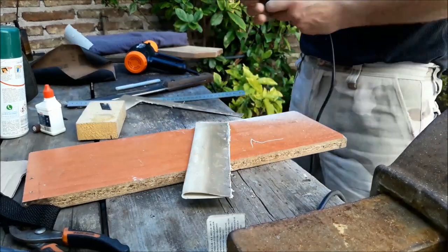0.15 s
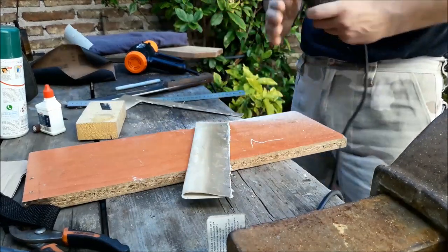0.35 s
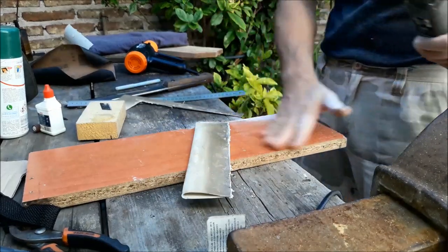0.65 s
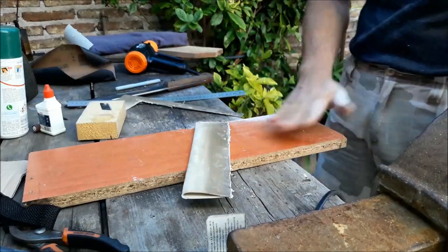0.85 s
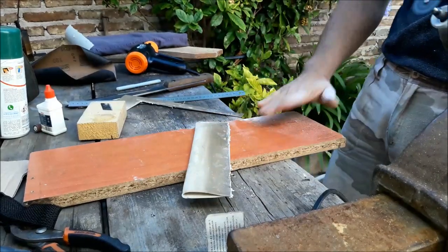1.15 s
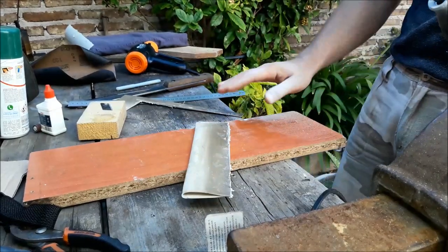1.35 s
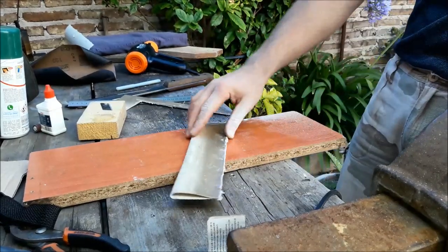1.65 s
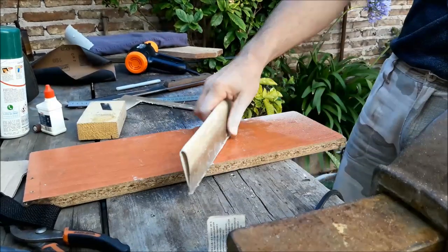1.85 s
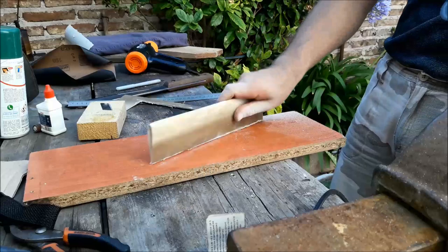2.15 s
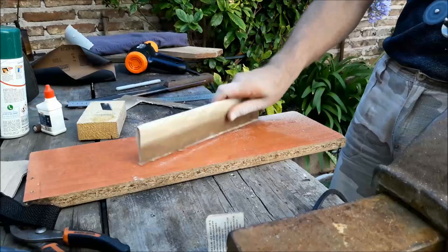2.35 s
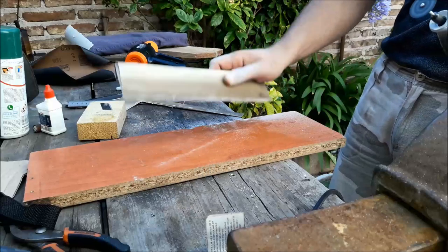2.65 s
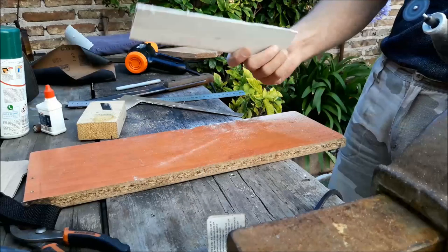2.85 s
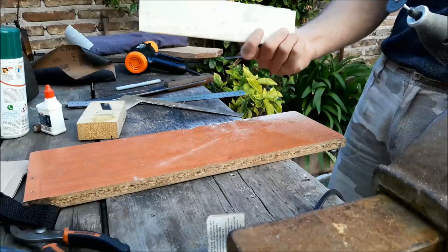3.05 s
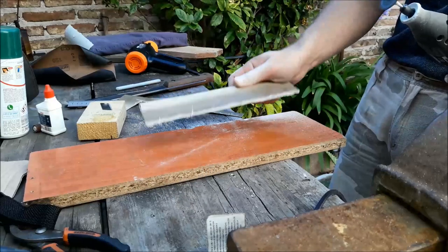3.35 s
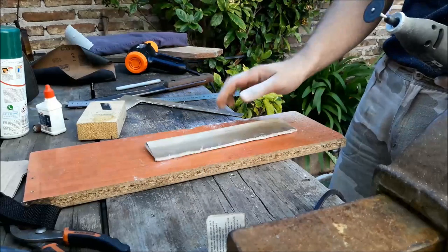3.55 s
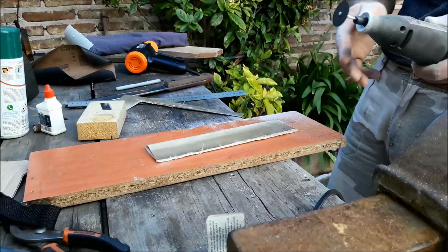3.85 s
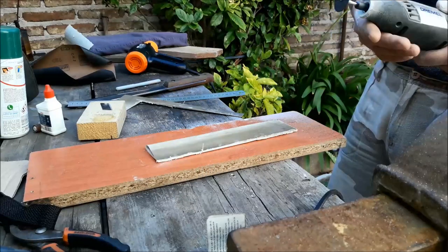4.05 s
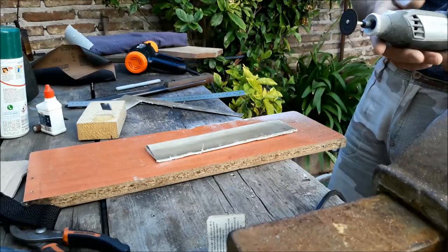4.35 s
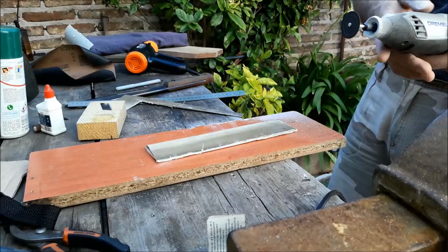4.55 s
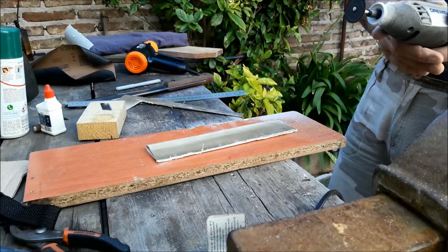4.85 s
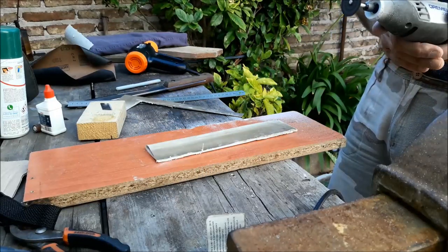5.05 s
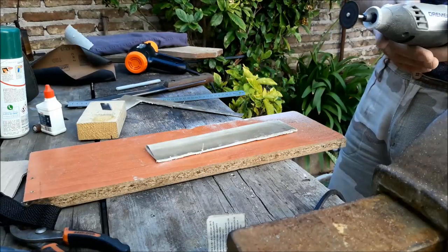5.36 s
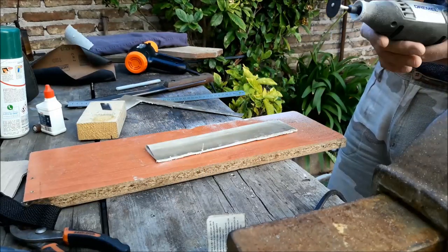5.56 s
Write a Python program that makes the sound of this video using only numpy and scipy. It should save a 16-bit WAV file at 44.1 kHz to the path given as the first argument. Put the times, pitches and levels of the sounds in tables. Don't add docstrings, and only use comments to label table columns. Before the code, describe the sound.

A small rotary tool whines and hisses freely at high speed while plastic pipe raps a board three times, then it begins winding down.

```python
import sys
import numpy as np
from scipy import signal
from scipy.io import wavfile
from scipy.ndimage import uniform_filter1d, minimum_filter1d

SR = 44100
rng = np.random.default_rng(int(sys.argv[2]) if len(sys.argv) > 2 else 0)


def volts_from_decibels(level):
    exponent = np.asarray(level, float) / 20
    return 10 ** exponent


def generate_wav(sig):
    pcm = np.round(np.clip(np.atleast_2d(sig).T, -1, 1) * 32767).astype(np.int16)
    wavfile.write(sys.argv[1], SR, pcm)


N = 252247

CONTACT_S = [
    .743,
    1.276,
    1.936,
    2.2568,
    2.4277,
    2.6019,
    3.651,
    3.702,
]
# kind, weight into bench/dB, knock of board/dB, snap of edge and pipe/dB
CONTACT_LEVELS = [
    ("pat", -33.5, -48, -47),
    ("pat", -28, -33, -36),
    ("pat", -43, -45, -46),
    ("knock", -20, -3, 3),
    ("knock", -15.5, -1, 5),
    ("knock", -15, -7, 9),
    ("lay", -30, -27, -17),
    ("lay", -33, -49, -23),
]


def in_time(rows):
    s, *columns = np.transpose(rows)
    return [np.interp(np.arange(N) / SR, s, c) for c in columns]


def rms_one(x):
    return x / np.sqrt(np.mean(x ** 2) + 1e-20)


def noise():
    return rng.standard_normal(N)


def drift(rate_hz):
    r = np.exp(-80 * np.pi * rate_hz / SR)
    slow = signal.lfilter([1], [1, -2 * r, r * r], rng.standard_normal(N // 40 + 2002))[2000:]
    return np.interp(np.arange(N) / 40, np.arange(len(slow)), rms_one(slow))


def band(x, low_hz, high_hz, order=2):
    return signal.sosfilt(signal.butter(order, [low_hz, high_hz], "band", fs=SR, output="sos"), x)


def ring(clicks, hz, t60_s):
    r = volts_from_decibels(-60 / (t60_s * SR))
    w = 2 * np.pi * hz / SR
    return signal.lfilter([0, np.sin(w)], [1, -2 * r * np.cos(w), r * r], clicks + 1e-18)


def tool():
    # t/s, nearness as case roar level/dB, vents turned to the microphone/dB
    hand = [(0, -23.5, -1), (.05, -24.5, -2.5), (.17, -23.5, 0), (.35, -25, -3.5), (.68, -25.5, -4),
            (.81, -28, 3.5), (1.16, -27.5, -1.5), (1.4, -27.5, -1.5), (1.7, -28, -4), (2.23, -29.5, -2.5),
            (3.45, -26, -4), (3.6, -25.5, -5), (3.8, -26, -3), (4.16, -25.5, 1), (4.65, -27.5, 1.5),
            (4.99, -28.5, 1), (5.1, -28, 2), (5.72, -27, 0)]
    # t/s, hollow resonance f/Hz, its level against the roar/dB
    grip = [(0, 2200, 0), (.12, 2177, 0), (.2, 1710, -8), (.45, 1473, -1), (.75, 1272, -9),
            (2.2, 1249, -11.5), (4.0, 1300, -6), (5.72, 1279, -6.5)]
    speed = shaft_speed()
    near_db, aim_db = in_time(hand)
    hollow_hz, hollow_db = in_time(grip)

    slowed_db = 20 * np.log10(speed / 515.4)
    roar_db = near_db + 2.27 * slowed_db
    mid_db = roar_db - 1.2 + 0.22 * aim_db
    jet_db = near_db + aim_db + 3 * slowed_db
    top_db = -26.5 + 0.36 * (near_db - near_db.mean()) - 0.32 * aim_db + 4.9 * slowed_db
    top_db = top_db - 8 * np.log2(hollow_hz / hollow_hz.min())

    angle = 2 * np.pi * np.cumsum(speed) / SR
    tones = shaft_tones(speed, angle, roar_db)
    pulsing = 1 + .05 * np.sin(angle)
    hiss = air_hiss(mid_db, jet_db, top_db, aim_db)
    roar = volts_from_decibels(roar_db - 3.0) * case_roar(hollow_hz, hollow_db)
    return np.sqrt(2) * tones + yard(roar + pulsing * hiss)


def shaft_speed():
    full_speed, cold_loss, warm_s = 515.4, 3.7, 1.05
    switch_off_s, coast_per_s = 5.113, .423
    t = np.arange(N) / SR
    running = full_speed - cold_loss * np.exp(-t / warm_s)
    return running * np.exp(-coast_per_s * np.maximum(t - switch_off_s, 0))


def shaft_tones(speed, angle, roar_db):
    # t/s, level/dB
    unbalance = [(0, -29.5), (.34, -30), (.64, -25), (.79, -27.5), (1.13, -29.5), (2.6, -28.5),
                 (3.21, -26.5), (3.79, -26), (3.91, -27), (4.18, -33.5), (5.06, -31.5), (5.12, -33),
                 (5.21, -38.5), (5.32, -35), (5.38, -41), (5.72, -39)]
    multiples = [1.5, 2, 2.5, 3, 7, 8, 14, 16, 19, 24]
    multiples_db = [-18, -15.5, -16.5, -18, -25, -21.5, -14, -18, -33, -37]
    unbalance_db = in_time(unbalance)[0]
    whine_db = whine_level()
    blades = 18 * angle + .15 * drift(30)
    tones = volts_from_decibels(unbalance_db + 0.6 * drift(14)) * np.sin(angle)
    tones += volts_from_decibels(whine_db + 1.0 * drift(17)) * np.sin(blades)
    tones += volts_from_decibels(whine_db - 28) * np.sin(2 * blades)
    powered = np.clip((speed - 490) / 20, .25, 1)
    for multiple, db in zip(multiples, multiples_db):
        level = volts_from_decibels(roar_db + db + 3.9 * drift(6.5))
        tones += powered * level * np.sin(multiple * angle + 0.59 * drift(2.8))
    return tones


def whine_level():
    # t/s, level/dB
    beam = [(0, -25), (.17, -17.5), (.38, -21), (.55, -29), (.72, -21), (1.13, -20), (1.48, -21.5),
            (2.1, -24), (2.77, -24), (3.31, -16.5), (3.76, -21.5), (4.05, -19), (4.4, -20.5), (4.85, -24),
            (5.05, -37), (5.16, -26), (5.44, -19.5), (5.72, -13)]
    # t/s, depth/dB, half length/s
    nulls = [(0.123, 11, 0.036), (.21, 5, 0.039), (.32, 18, .025), (0.414, 10, .05), (0.524, 16, .025),
             (.585, 8, 0.037), (0.669, 7, 0.037), (.89, 3, 0.11), (1.07, 2, .07), (1.363, 4.5, 0.14),
             (3.651, 3.5, 0.069), (3.967, 9, 0.071), (4.167, 11, 0.16), (4.97, 9, .04), (5.11, 26, .03),
             (5.173, 14, 0.027), (5.382, 9, 0.052), (5.465, 12, 0.013), (5.536, 4, .05), (5.642, 17, 0.015),
             (5.702, 4, 0.058)]
    t = np.arange(N) / SR
    dips_db = sum(db * np.maximum(1 - np.abs(t - s) / half_s, 0) for s, db, half_s in nulls)
    return in_time(beam)[0] - dips_db


def air_hiss(mid_db, jet_db, top_db, aim_db):
    # f/Hz, width/Hz, level/dB
    vent_peaks = [(7065, 490, -2.5), (6530, 680, -7), (7495, 240, -8)]
    # f/Hz, width/Hz, level/dB
    top_peaks = [(9950, 3900, 6), (12500, 1600, 1), (14700, 1000, -1.5)]
    jet = resonant_noise(vent_peaks, patchy_db=0.96)
    high = band(resonant_noise(top_peaks, patchy_db=0.6), 5900, 21000)
    mid = rms_one(band(noise(), 2360, 5200))
    shadow = np.clip(.55 + .02 * aim_db, 0, 1)
    hiss = volts_from_decibels(mid_db - 1.37) * (mid - shadow * band(mid, 3940, 4620, order=1))
    hiss += volts_from_decibels(jet_db) * jet / np.std(band(jet, 5330, 7050, order=4))
    hiss += volts_from_decibels(top_db) * high / np.std(band(high, 10500, 14000, order=4))
    return hiss


def resonant_noise(peaks, patchy_db):
    out = 0
    for hz, width_hz, db in peaks:
        peak = band(noise(), hz - width_hz / 2, hz + width_hz / 2, order=1) / np.sqrt(width_hz)
        out = out + volts_from_decibels(db + patchy_db * drift(4.0)) * peak
    return out


def case_roar(hollow_hz, hollow_db):
    # f/Hz, level per Hz/dB
    roar_spectrum = [(30, -54), (60, -34), (100, -23.5), (200, -14), (300, -15), (450, -13), (600, -3.5),
                     (770, -10), (1010, 1), (1300, -2.5), (1700, 0.5), (2300, -4.5), (3300, -9.5)]
    out = 0
    edges_hz = 36 * 2 ** np.arange(0, 6.4, 1 / 3)
    hz, db = np.transpose(roar_spectrum)
    for low, high in zip(edges_hz, edges_hz[1:]):
        level_db = np.interp(np.log(low * high) / 2, np.log(hz), db)
        out = out + volts_from_decibels(level_db + 0.62 * drift(9.5)) * band(noise(), low, high)
    out = out / np.std(band(out, 650, 2800))
    low_pass = signal.butter(2, 130, fs=SR, output="sos")
    slow = signal.sosfilt(low_pass, rng.standard_normal((2, N)))
    turn = 2 * np.pi * np.cumsum(hollow_hz) / SR
    hollow = rms_one(slow[0] * np.cos(turn) + slow[1] * np.sin(turn))
    return out + volts_from_decibels(hollow_db) * hollow


def yard(x):
    # delay/ms, level/dB, wander/ms
    echoes = [
        (2.5, -13, .15),
        (5.6, -12, .04),
    ]
    out = x.copy()
    for delay_ms, db, wander_ms in echoes:
        late = np.arange(N) - (delay_ms + wander_ms * drift(.5)) * SR / 1000
        out += volts_from_decibels(db) * np.interp(late, np.arange(N), x)
    return out


def knocks():
    kinds = {"pat": (0, -4, -3), "knock": (-15.5, 2.5, -1), "lay": (-20, -26, 0)}
    # f/Hz, level/dB, t60/s
    edge_modes = [(700, -2, .015), (1200, -2, .02), (2100, -3, .02), (2950, -3, .025), (4300, -7, .02),
                  (5300, -12, .012)]
    # f/Hz, level/dB, t60/s
    pipe_modes = [(930, -13, .05), (1180, -11, .05), (1500, -4, .04), (1720, 0, .04), (2050, -2, .03),
                  (2950, -3, .04)]
    # f/Hz, level/dB, t60/s
    board_knock = [(530, 3, .06), (455, -5, .1), (585, -8, .1), (686, -6, .03), (790, -16, .08)]
    # f/Hz, level/dB, t60/s
    board_ring = [(375, -5, .3), (320, -8, .1), (380, -5, .3), (350, -6, .15)]
    # f/Hz, level/dB, t60/s
    bench_modes = [(125, -11, .25), (155, -4, .4), (183, 0, .22), (205, -5, .15)]
    laid_s = [3.635, 3.648, 3.654, 3.72, 3.845]
    laid_db = [-26, -5, -15, -17, -21]
    # f/Hz, level/dB, t60/s
    flat_modes = [(600, -4, .025), (850, -3, .025), (1100, -1, .05), (1350, -1, .025), (1650, -3, .025),
                  (2900, -4, .025)]
    thud_db, knock_db, snap_db = np.transpose([row[1:] for row in CONTACT_LEVELS])
    ring_db, tick_db, slap_db = np.transpose([kinds[row[0]] for row in CONTACT_LEVELS]) + snap_db
    out = strike(CONTACT_S, edge_modes, tick_db - 4, delay_s=0)
    out += strike(CONTACT_S, pipe_modes, slap_db - 3, delay_s=.0035, spread_s=.001)
    out += strike(CONTACT_S, board_knock, knock_db, delay_s=.0005)
    out += strike(CONTACT_S, board_ring, ring_db + 3, delay_s=.0032)
    out += strike(CONTACT_S, bench_modes, thud_db - 1.5, delay_s=.0038)
    out += dying_noise(tick_db, 0, [(700, 4800, -14, .045), (3000, 5600, -15, .03)])
    out += dying_noise(slap_db, 0.0026, [(240, 1740, -16.5, 0.33), (1300, 3300, -22.5, 0.44),
                                         (3350, 8900, -15.5, 0.1)])
    out += strike(laid_s, flat_modes, np.array(laid_db) - 4, delay_s=0)
    return signal.sosfilt(signal.butter(4, 5600, fs=SR, output="sos"), out)


def strike(times_s, modes, blow_db, delay_s, spread_s=0):
    late, force = rng.random((2, len(times_s)))
    colour = rng.standard_normal((len(times_s), len(modes)))
    at = np.round((np.array(times_s) + delay_s + spread_s * late) * SR).astype(int)
    out = 0
    for k, (hz, db, t60_s) in enumerate(modes):
        clicks = np.zeros(N)
        height = (.7 + .3 * force) * volts_from_decibels(blow_db + db + 1.5 * colour[:, k])
        np.add.at(clicks, at, (-1) ** k * height)
        out = out + ring(clicks, hz, t60_s)
    return out


def dying_noise(level_db, delay_s, bands):
    start = np.zeros(N)
    start[np.round((np.array(CONTACT_S) + delay_s) * SR).astype(int)] = volts_from_decibels(level_db)
    out = 0
    for low_hz, high_hz, db, t60_s in bands:
        dying = signal.lfilter([1], [1, -volts_from_decibels(-60 / (t60_s * SR))], start)
        out = out + volts_from_decibels(db) * dying * rms_one(band(noise(), low_hz, high_hz))
    return out


def low_hum():
    # peak t/s, level/dB, half length/s
    swells = [(.15, -55, .3), (.95, -55, 0.29), (1.797, -53.5, 0.28), (2.951, -55, 0.096),
              (3.55, -51.5, 0.31), (4.4, -58, 0.484), (5.081, -50, .1), (5.432, -54, 0.2)]
    t = np.arange(N) / SR
    swell = sum(volts_from_decibels(db) * np.exp(-((t - s) / half_s) ** 2) for s, db, half_s in swells)
    drone = swell * rms_one(band(noise(), 91.5, 109))
    return drone + volts_from_decibels(-59.5) * rms_one(band(noise(), 17, 98))


def scene():
    mono = tool() + low_hum() + knocks()
    return np.array([mono, mono])


def gain_control():
    start_db, creep_db_per_s = -1.5, 1.8542
    duck_db, sink_db, sink_s, threshold_db = 3.4, .8, .1, -10
    recover_s, recover_length_s, recover_db = 3.168, 0.28, 7
    t = np.arange(N) / SR
    recovery = np.sin(np.pi / 2 * np.clip((t - recover_s) / recover_length_s, 0, 1)) ** 2
    gain_db = start_db + creep_db_per_s * t + recover_db * recovery
    for s, (*_, snap_db) in zip(CONTACT_S, CONTACT_LEVELS):
        if snap_db > threshold_db:
            sinking_db = sink_db * (1 - np.exp(-np.maximum(t - s, 0) / sink_s))
            gain_db = gain_db - (t > s) * (duck_db + sinking_db)
    return gain_db


def limiter(x):
    over_db = np.maximum(20 * np.log10(np.abs(x[0]) + 1e-9) + .6, 0)
    fall_db = 400 * np.arange(N) / SR
    held_db = np.maximum.accumulate(over_db + fall_db) - fall_db
    ahead_db = -minimum_filter1d(-held_db, size=221, origin=-110)
    return x * volts_from_decibels(-uniform_filter1d(ahead_db, size=41))


def whine_spill():
    centre_s, half_s, level_db = 5.648, 0.019, -14
    window = np.cos(np.pi / 2 * np.clip((np.arange(N) / SR - centre_s) / half_s, -1, 1))
    return volts_from_decibels(level_db) * window * rms_one(band(rng.standard_normal((2, N)), 6640, 7620, order=4))


def top_cut(x):
    return signal.sosfilt(signal.butter(12, 16820, fs=SR, output="sos"), x)


def record(dry):
    x = signal.sosfilt(signal.butter(2, 65, "high", fs=SR, output="sos"), dry)
    x = limiter(x * volts_from_decibels(gain_control()))
    x = signal.sosfilt(signal.ellip(14, .2, 70, 15760, fs=SR, output="sos"), x)
    mix = np.clip(x + whine_spill(), -1, 1)
    return top_cut(mix)


dry = scene()
out = record(dry)
generate_wav(out)
```